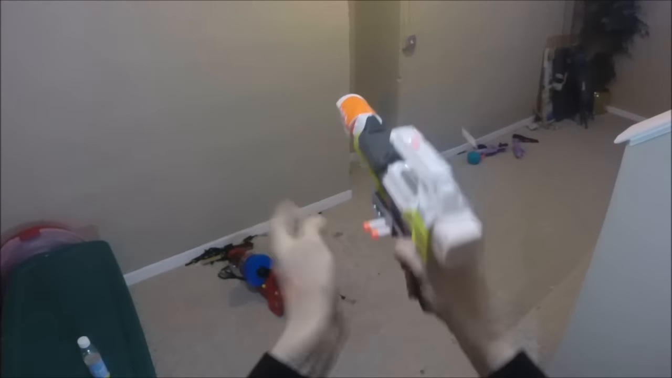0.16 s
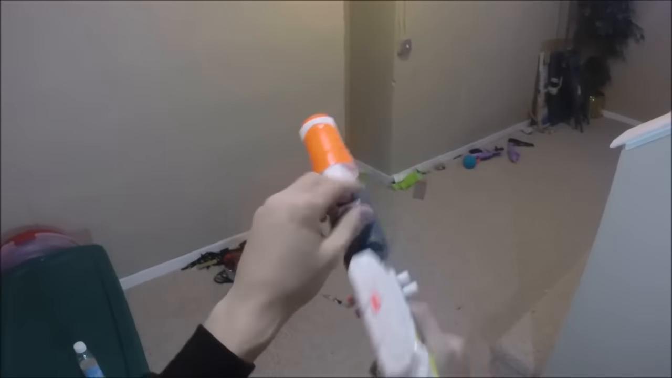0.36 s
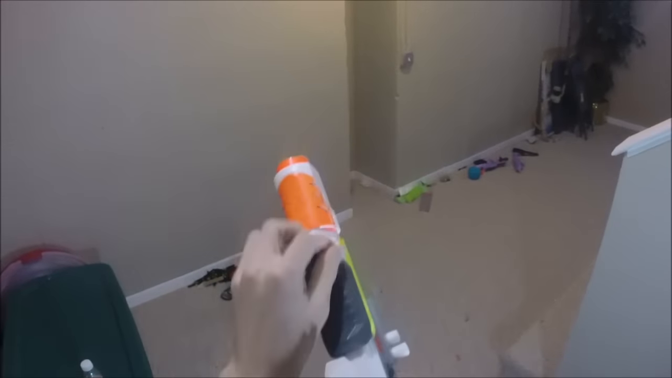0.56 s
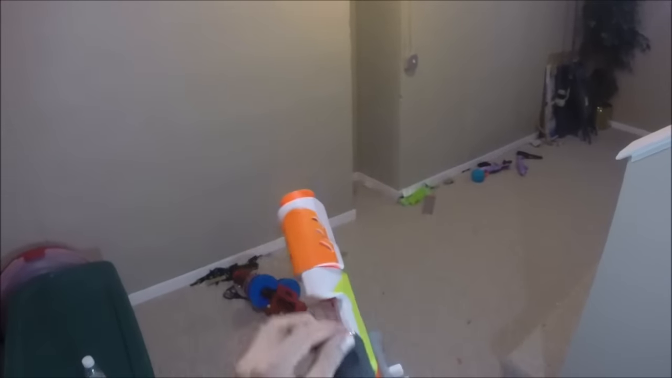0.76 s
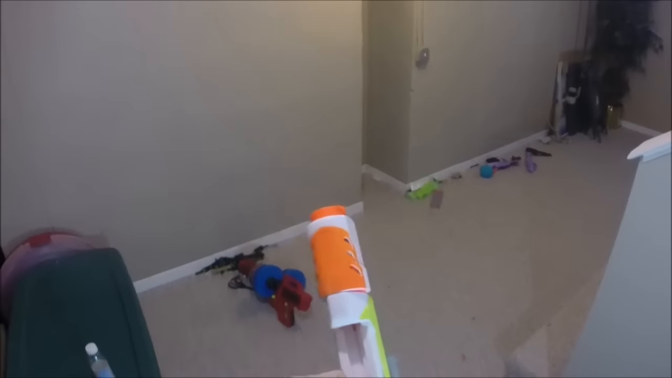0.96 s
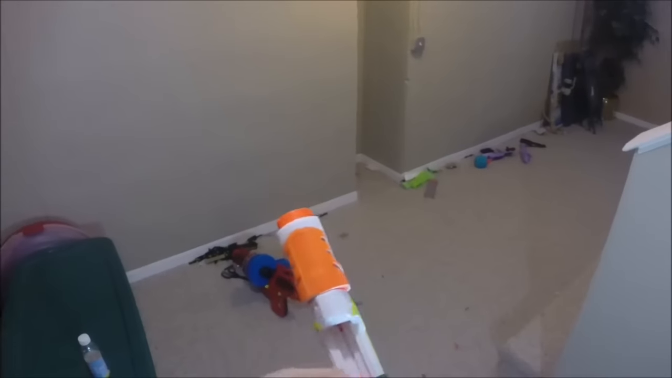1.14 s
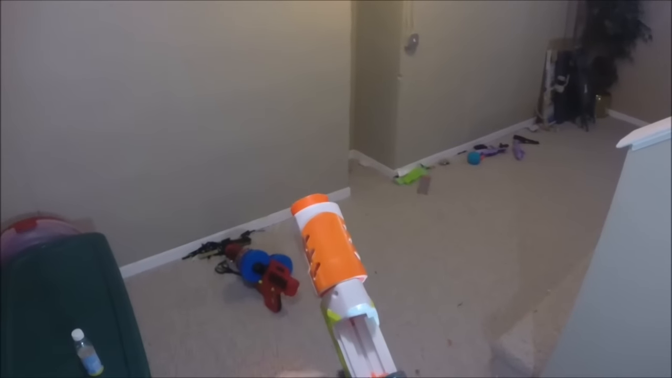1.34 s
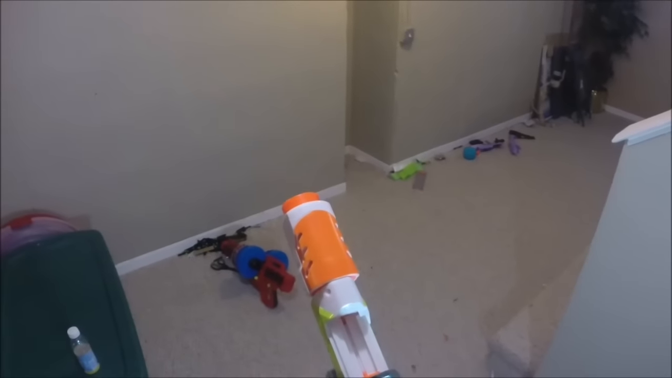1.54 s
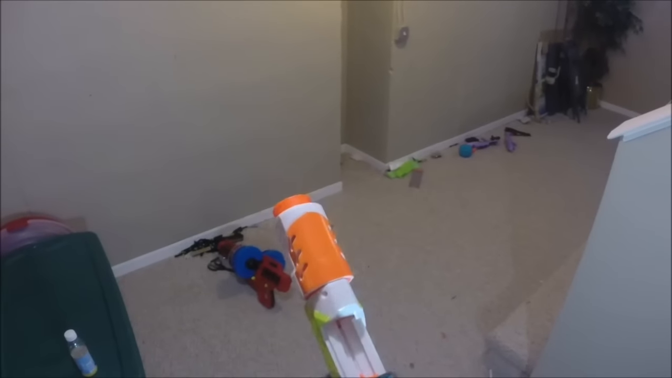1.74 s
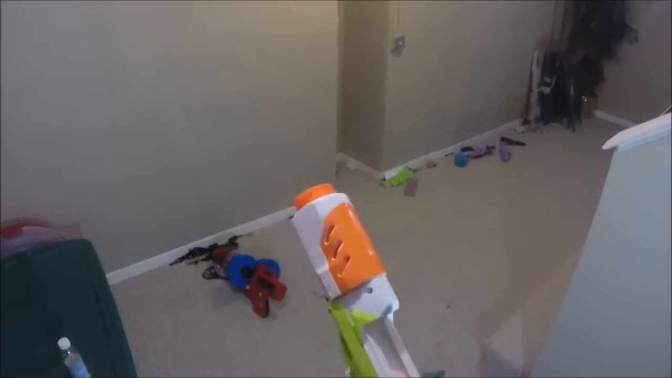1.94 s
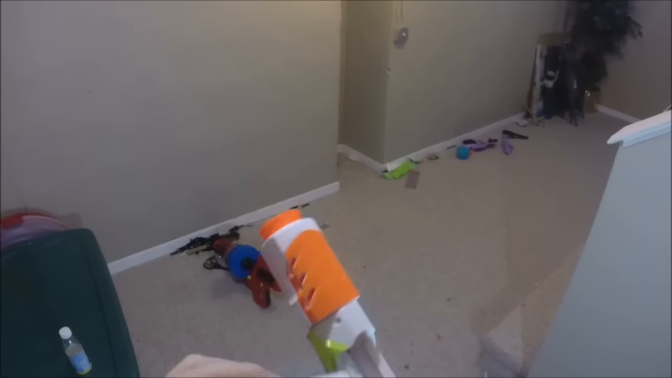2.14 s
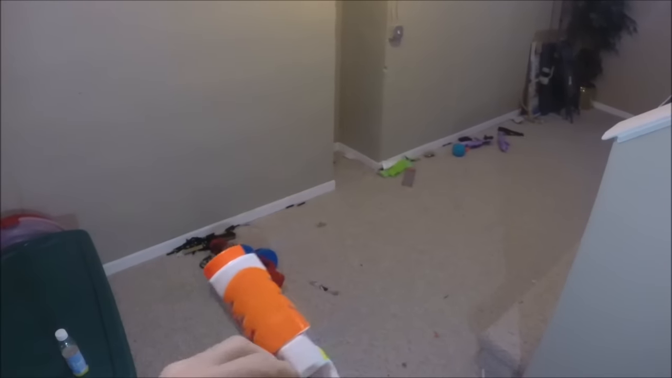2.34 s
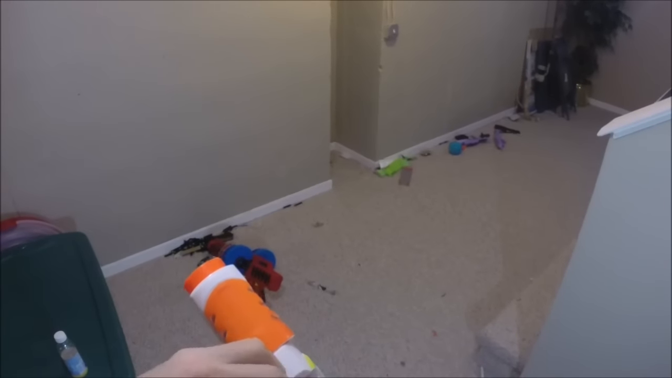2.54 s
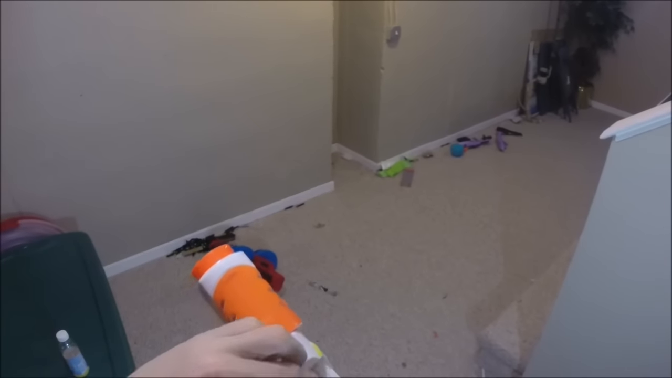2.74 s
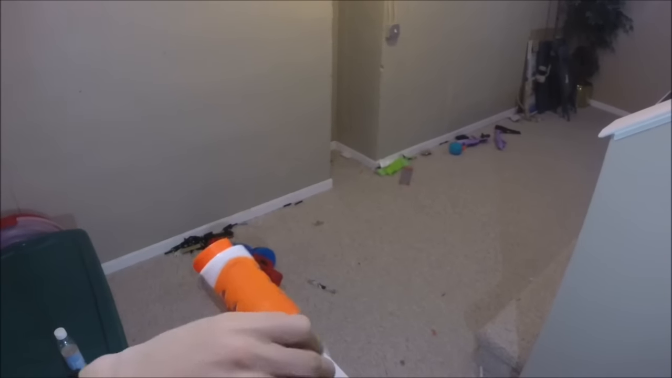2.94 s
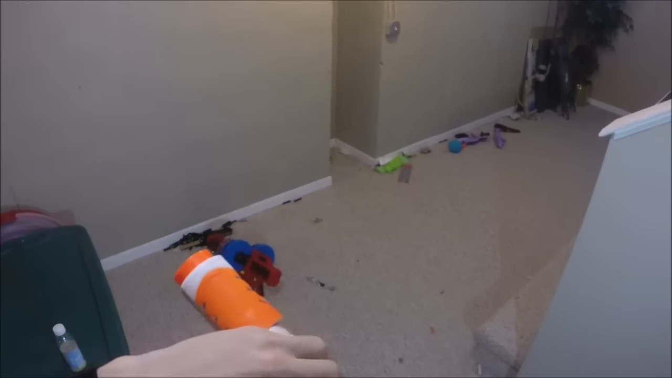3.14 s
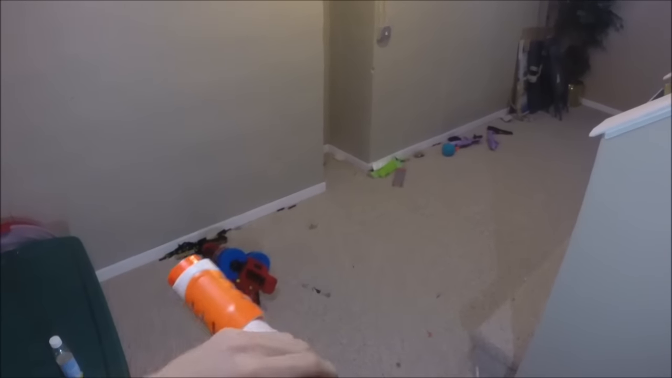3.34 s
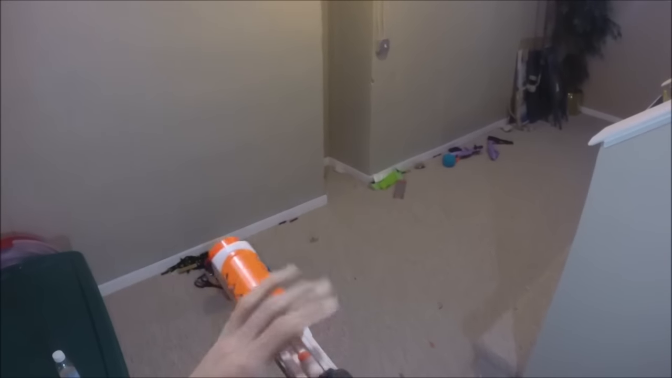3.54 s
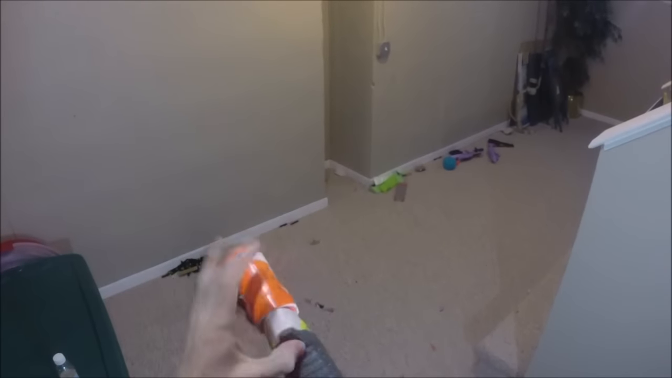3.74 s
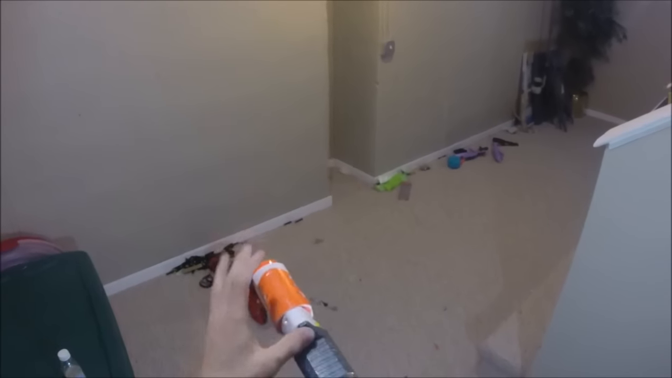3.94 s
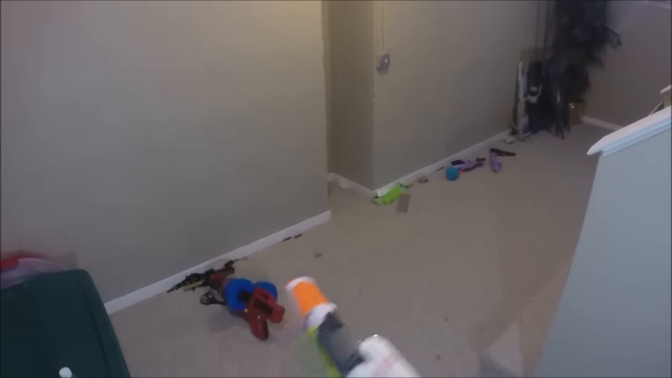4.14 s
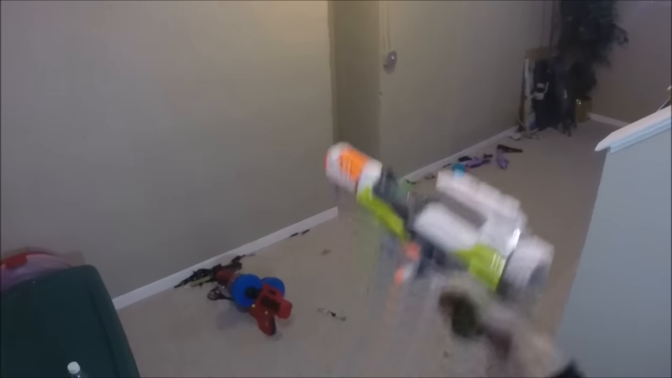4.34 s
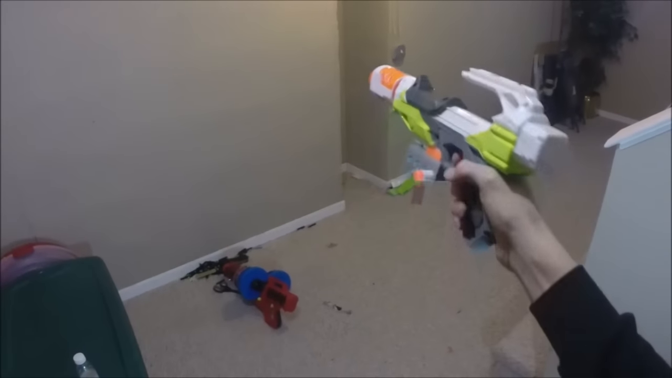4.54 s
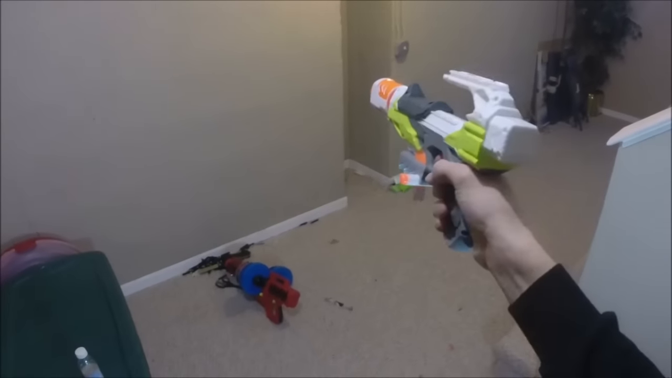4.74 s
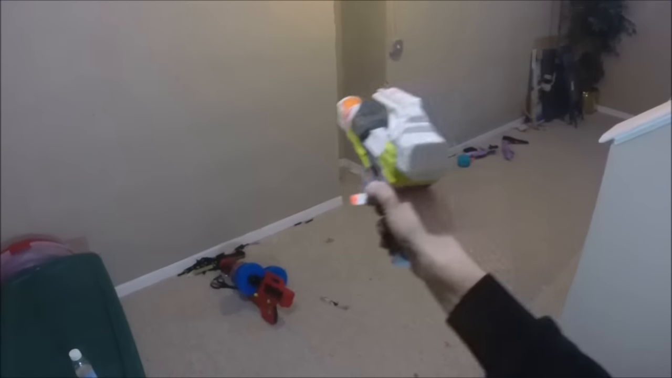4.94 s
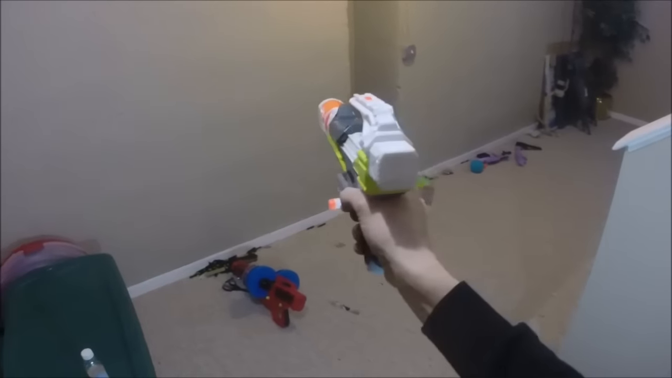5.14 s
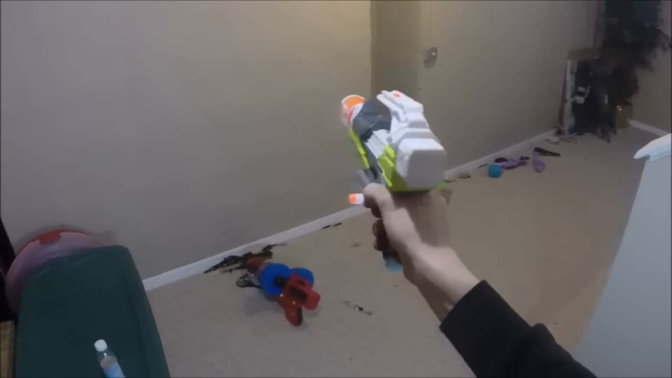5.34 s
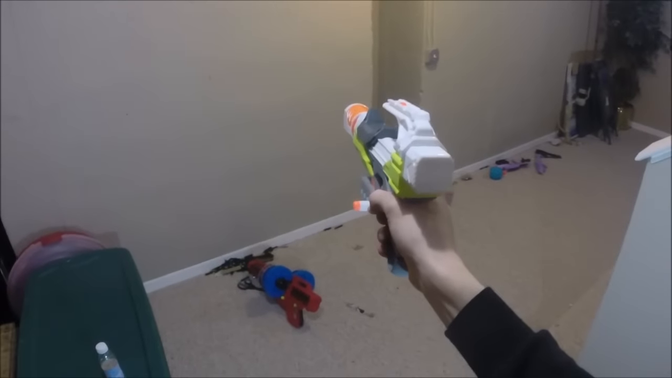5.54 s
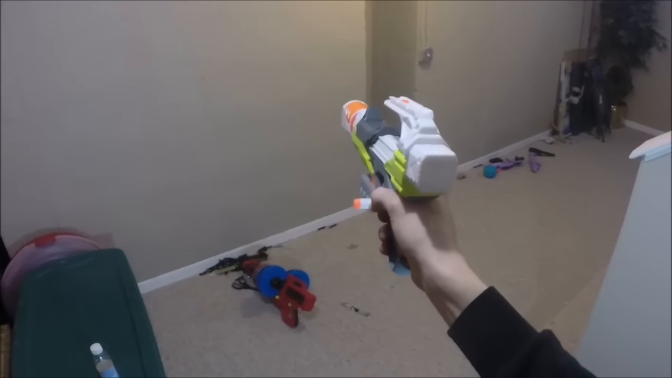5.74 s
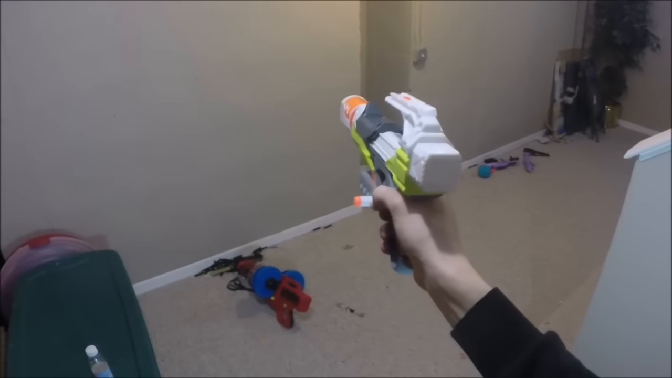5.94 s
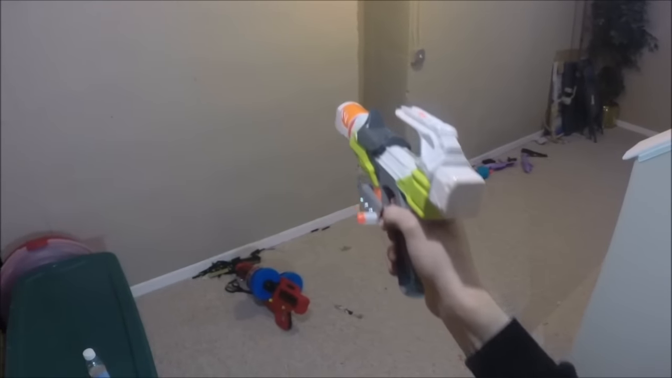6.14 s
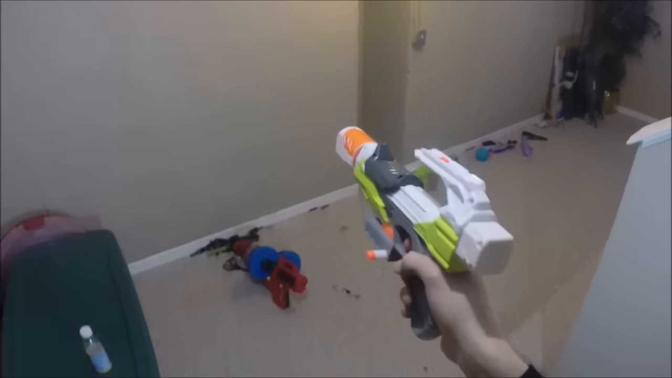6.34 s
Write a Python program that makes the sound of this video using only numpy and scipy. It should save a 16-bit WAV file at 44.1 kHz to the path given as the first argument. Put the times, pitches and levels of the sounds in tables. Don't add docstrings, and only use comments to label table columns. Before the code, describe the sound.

In a quiet room, a hollow plastic dart blaster clatters, is loaded by hand, snaps shut, fires with a twang, and its dart drops on carpet.

```python
import sys
import numpy as np
from scipy import signal
from scipy.fft import rfft, irfft, next_fast_len
from scipy.io import wavfile

SR = 44100
rng = np.random.default_rng(int(sys.argv[2]) if len(sys.argv) > 2 else 0)


def invert_db(x):
    u = np.asarray(x, float) / 20
    return 10 ** u


def master(y):
    cut = np.clip(np.atleast_2d(y).T, -1, 1)
    pcm = np.round(cut * 32767)
    wavfile.write(sys.argv[1], SR, pcm.astype(np.int16))


N = 281790

# (pitch_hz, width_hz, level_db)
SHELL_RINGS = [(736, 79, 5), (978, 68, 7), (1137, 73, 7.5), (1237, 190, 2), (1540, 130, -0.5),
               (1920, 420, -10)]
# (pitch_hz, width_hz, level_db)
TUBE_RINGS = [(665, 110, -4.5), (946, 150, 5), (1050, 110, 6.5), (1268, 37, 7.5), (1337, 120, -2),
              (1634, 120, -8.5)]


def unit(x):
    return x / np.sqrt(np.mean(x ** 2) + 1e-20)


def along(points, hz):
    f, v = np.transpose(points)
    return np.interp(np.log(hz + 1), np.log(f + 1), v)


def resonate(x, modes, scatter_db=0, widen=1):
    size = next_fast_len(len(x) + 4096)
    f = np.fft.rfftfreq(size, 1 / SR)
    luck = rng.standard_normal((len(modes), 2)) * scatter_db
    gain = 0
    for k, ((hz, width, db), (more_db, detune_percent)) in enumerate(zip(modes, luck)):
        pitch = hz * (1 + detune_percent / 100)
        damping = 1j * f * width * widen
        gain = gain + (-1) ** k * invert_db(db + more_db) * damping / (pitch ** 2 - f * f + damping)
    return irfft(rfft(x, size) * gain, size)[:len(x)]


def coloured(spectrum, size):
    m = next_fast_len(size + 8192)
    colour = invert_db(along(spectrum, np.fft.rfftfreq(m, 1 / SR)))
    return unit(irfft(rfft(rng.standard_normal(m)) * colour, m)[:size])


def echo(x):
    # (pitch_hz, t60_s)
    room_t60 = [(100, .25), (300, 0.3), (1000, 0.41), (3000, 0.47), (8000, 0.44), (14000, 0.23)]
    hz, t, z = signal.stft(rng.standard_normal(SR // 2), SR, nperseg=256)
    fade = invert_db(-60 * t / along(room_t60, hz)[:, None])
    tail = signal.istft(z * fade, SR, nperseg=256)[1]
    return signal.fftconvolve(np.pad(x, (200, 0)), tail / np.linalg.norm(tail))


def contacts(rows, rings_hit, hollow_db, crack_db, wet_db, blow, kick_db=-6):
    # (pitch_hz, width_hz, level_db)
    hollow = [(125, 72, -13.5), (205, 110, -5.5), (300, 120, -2.5), (424, 110, 1)]
    # (pitch_hz, width_hz, level_db)
    panel = [(2124, 170, 0.5), (2700, 180, -1.5), (3260, 160, -0.5), (3930, 210, -4), (4550, 410, -1),
             (4810, 520, -6)]
    # (pitch_hz, width_hz, level_db)
    crack = [(5680, 460, 1), (6670, 490, 6.5), (6850, 1500, -1.5), (9650, 1800, -21), (12000, 7500, -13.5)]
    # (pitch_hz, width_hz)
    spans = [(280, 1200), (1100, 2600), (3300, 8200), (6200, 7200)]
    lead = 4410
    out = np.zeros(lead + N + SR)
    t = np.arange(SR // 8) / SR
    push = np.exp(-.5 * ((t - .0002) / .00004) ** 2)
    soft = signal.butter(2, 9200, fs=SR, output="sos")
    parts = list(zip((hollow, rings_hit, panel, crack), [[(hz, width, 0)] for hz, width in spans]))

    def radiate(x, span):
        return resonate(resonate(x, span), span)

    click = 1. * (t == 0)
    blurred = np.array([np.abs(rfft(unit(resonate(radiate(click, span), modes, widen=2.3))))
                        for modes, span in parts])
    for start_s, level_db, hard_db, t60 in rows:
        unevenness = invert_db(5 * rng.standard_normal(len(t) // 40 + 1)).repeat(40)[:len(t)]
        rattle = rng.standard_normal(len(t)) * unevenness
        force = rattle * invert_db(-60 * t / np.clip(t60, .003, .2)) + blow * push / push.sum()
        force = signal.sosfilt(soft, force)
        kicks = [radiate(force, span) for _, span in parts]
        rings = np.array([resonate(kick, modes, scatter_db=3.0) + invert_db(kick_db) * kick
                          for kick, (modes, _) in zip(kicks, parts)])
        part_db = np.array([hollow_db, 0, hard_db, hard_db + crack_db])
        gains = invert_db(level_db + part_db) * [1, 1, -1, -1]
        rings *= (gains / np.abs(rings).max(axis=1))[:, None]
        diffuse = irfft(np.sqrt(np.var(rings, axis=1) @ blurred ** 2), len(t))
        tail = invert_db(wet_db) * echo(np.roll(diffuse, 400))
        start = lead + round(start_s * SR)
        out[start:][:len(t)] += rings.sum(axis=0)
        out[start - 300:][:len(tail)] += tail
    return out[lead:lead + N]


def room_hush():
    # (pitch_hz, level_db per Hz)
    hush = [(12, -37.5), (20, -1), (204, -5.5), (388, -10), (1060, -14.5), (3440, -23), (13200, -36.5),
            (16000, -54)]
    return invert_db(-58.5) * coloured(hush, N)


def plunger_shots():
    # (start_s, level_db, hardness_db, rattle_t60_s)
    earlier = [
        (-.03, -9.5, -2.5, 0.1),
        (.004, -25, -8, 0.023),
        (.034, -32.5, -3, 0.011),
    ]
    # (start_s, level_db, hardness_db, rattle_t60_s)
    new_shot = [
        (5.293, -31.5, -4.5, 0.023),
        (5.295, -14.5, 0, .032),
        (5.3, -7.5, -6, 0.024),
        (5.3042, -3.5, -18, .04),
        (5.320, -4, -10.5, 0.035),
        (5.327, -14.5, -4.5, .09),
    ]
    return contacts([*earlier, *new_shot], TUBE_RINGS, hollow_db=-7.5, crack_db=-8.5,
                    wet_db=-8.0, blow=16.6, kick_db=-13.5)


def spring():
    # (struck_s, damped_by_hand_s)
    times = [
        (-.02, .21),
        (-.02, .675),
        (5.302, 6.1),
        (1.101, 1.34),
    ]
    # (pitch_hz, level_db, t60_s,
    # swell_s)
    low_coil = [(165, -43.5, 0.74, .03), (301, -37, 1, 0.14)]
    high_coil = [(1012, -48, 2, 0.13), (1300, -39.5, 0.79, 0.013), (1395, -40, 4, 0.84)]
    coil_and_thump = [(138, -25, 0.18, .003), (206, -20.5, 0.32, 0.0045), (250, -24.5, 0.14, .003),
                      (286, -29, 0.26, 0.0038), (1080, -33, 0.56, 0.0093), (1240, -44.5, 0.6, .01),
                      (1330, -55.5, 2, .05)]
    return_coil = [(900, -33.5, 0.42, .004), (954, -42.5, 0.57, 0.0039), (3620, -61, 0.37, .02)]
    out = np.zeros(N)
    for (struck, damped), tones in zip(times, (low_coil, high_coil, coil_and_thump, return_coil)):
        t = np.clip(np.arange(N) / SR - struck, 0, None)
        damping_db = -60 * np.clip(t + struck - damped, 0, None) / .15
        for hz, db, t60, swell in tones:
            loudness = invert_db(db - 60 * t / t60 + damping_db) * (1 - np.exp(-t / swell))
            out += loudness * np.sin(2 * np.pi * hz * t)
    return out


def dart_hits():
    # (start_s, level_db, hardness_db, rattle_t60_s)
    hits = [
        (.119, -32.5, -8, 0.084),
        (5.436, -18, -11, 0.1),
    ]
    return contacts(hits, TUBE_RINGS, hollow_db=-11.5, crack_db=-13.5, wet_db=-0.5, blow=28)


def taps(rows, hollow_db):
    out = np.zeros(N)
    for *row, hz in rows:
        rings = [(hz, hz / 16, 0)] + [(pitch, width, db - 12.5) for pitch, width, db in SHELL_RINGS]
        out += contacts([(*row, .04)], rings, hollow_db, crack_db=-6.5, wet_db=-5.0, blow=25, kick_db=-16.5)
    return out


def palm_pats():
    # (start_s, level_db, hardness_db, pitch_hz)
    pats = [
        (.447, -28.5, -13.5, 652),
        (.637, -42, -9, 1400),
        (1.864, -45, -3, 730),
        (2.175, -44, -33.5, 420),
        (3.063, -48, 3, 907),
        (5.211, -32.5, -11, 810),
        (5.243, -37.5, -25, 859),
    ]
    return taps(pats, hollow_db=-3.5)


def finger_ticks():
    # (start_s, level_db, hardness_db, pitch_hz)
    ticks = [(.529, -41.5, -10.5, 1490), (.686, -22.5, -14, 730), (.711, -29, -4, 700),
             (1.454, -39.5, -14, 1010), (1.653, -50.5, 1, 713), (2.377, -40, -9, 1050),
             (2.443, -47.5, 0, 953), (2.48, -48, -20, 762), (2.551, -50.5, -1, 1030),
             (3.041, -37.5, -9.5, 974), (3.187, -39, -21, 751), (3.196, -43, -6, 1050),
             (3.335, -35.5, -11.5, 875), (3.394, -39.5, -11, 890), (3.433, -39, -6.5, 2030),
             (3.492, -45, -14, 982), (3.567, -34, -7, 1010), (4.261, -48.5, -1.5, 1240)]
    return taps(ticks, hollow_db=-14.5)


def rubbing():
    # (peak_s, build_up_s, letting_go_s, shell_db, hiss_db)
    strokes = [(0.67, 0.11, 0.084, -45.5, -55.5), (0.719, 0.0045, 0.027, -32, -48.5),
               (.758, 0.043, 0.011, -62, -58), (1.04, .01, .1, -44, -82), (1.08, 0.035, 0.0085, -51, -46),
               (1.219, .004, 0.022, -39, -83), (1.83, 0.035, 0.057, -46, -42.5),
               (2.174, .05, 0.23, -52, -79), (2.386, .12, 0.045, -64, -63), (2.445, 0.035, 0.027, -52, -56),
               (3.04, 0.048, 0.11, -46.5, -59), (3.1, 0.15, 0.034, -54, -61.5),
               (3.189, .04, 0.098, -48, -61), (3.708, .004, 0.019, -38, -55),
               (3.754, .003, 0.15, -30.5, -49.5), (3.786, .1, 0.0092, -41, -47),
               (5.22, 0.0057, .05, -47, -61.5), (5.245, .01, .2, -74, -74.5)]
    # (pitch_hz, level_db per Hz)
    skin = [(1500, -27), (3000, 1.5), (5000, 2), (7000, -4), (10000, -21.5), (15000, -45.5)]
    span_db = 30
    t = np.arange(N) / SR
    grains = rng.standard_normal(N) * invert_db(2 * rng.standard_normal(N // 60 + 1)).repeat(60)[:N]
    body = unit(resonate(grains, SHELL_RINGS))
    hiss = coloured(skin, N)
    press, slip = np.zeros((2, N))
    for peak, rise, fall, shell_db, hiss_db in strokes:
        near = slice(round((peak - 2 * rise) * SR), round((peak + 2 * fall) * SR))
        stroke = invert_db(-span_db * np.maximum((peak - t[near]) / rise, (t[near] - peak) / fall))
        press[near] += invert_db(shell_db - 3) * stroke
        slip[near] += invert_db(hiss_db - 1.5) * stroke
    out = press * body + slip * hiss
    return out + invert_db(-16) * echo(out)[:N]


def slide_rack():
    # (start_s, level_db, hardness_db, rattle_t60_s)
    rack = [(0.764, -35, -10.5, .01), (0.7714, -15.5, -12, 0.013), (.773, -7.5, 0.5, 0.027),
            (0.779, -10.5, 3.5, 0.054), (.82, -7, 2, 0.072), (.825, -13, -9, 0.11), (.842, -5.5, -3, 0.053),
            (.88, -5.5, -2, 0.035), (.886, -12, 0.5, 0.064), (.905, -7, -4, 0.041), (1.084, -29, -5, 0.26),
            (1.101, -12.5, -3, 0.044), (1.193, -44, -24, .035)]
    # (start_s, level_db, hardness_db, rattle_t60_s)
    stops = [
        (.919, -16.5, 7.5, 0.053),
        (.93, -15, -5.5, 0.079),
        (1.21, -26, -23, 0.074),
    ]
    blow = 32
    moving = contacts(rack, SHELL_RINGS, hollow_db=-39.5, crack_db=-6, wet_db=-10.5, blow=blow, kick_db=-13.5)
    ending = contacts(stops, SHELL_RINGS, hollow_db=-20, crack_db=-3.5, wet_db=-18.5, blow=blow, kick_db=-14.5)
    return moving + ending


def squeak():
    # (start_s, end_s, level_db of each harmonic)
    foam_squeak = (2.44, 2.53, [-83, -74, -75, -74])
    start, end, levels = foam_squeak
    pitch_hz = 3320
    t = np.arange(N) / SR
    edge = np.clip(np.minimum(t - start, end - t) / 0.012, 0, 1)
    return edge * sum(invert_db(db) * np.sin(2 * np.pi * pitch_hz * (k + 1) * t) for k, db in enumerate(levels))


def breech_snap():
    # (start_s, level_db, hardness_db, rattle_t60_s)
    breech = [(3.701, -26.5, -10.5, 0.037), (3.752, -29, -9.5, .033), (3.768, -32.5, -3, 0.015),
              (3.787, -29, 1, 0.037), (3.79, -14, -3, 0.041), (3.7941, -4, -5, 0.028),
              (3.797, -0.5, -7.5, 0.032), (3.800, -8.5, -2, 0.026), (3.805, -12, -8, 0.073),
              (3.811, -15, -11, 0.095), (3.836, -21.5, -6, 0.061)]
    return contacts(breech, SHELL_RINGS, hollow_db=-23, crack_db=-6, wet_db=-11, blow=20, kick_db=-3.5)


def dart_on_carpet():
    # (pitch_hz, width_hz, level_db)
    carpet = [(348.4, 127, -3.5), (484, 80, 1.5), (751, 150, -6.5), (910, 164, -4.5)]
    # (start_s, level_db, hardness_db, rattle_t60_s)
    drops = [
        (5.865, -29, -42, 0.26),
    ]
    # (start_s, level_db, hardness_db, rattle_t60_s)
    rolls = [
        (5.93, -55.5, -30, 0.061),
        (6.31, -50.5, -33.5, 0.12),
    ]
    landing = contacts(drops, carpet, hollow_db=2.5, crack_db=-7, wet_db=-13.0, blow=22.0, kick_db=-26)
    rolling = contacts(rolls, carpet, hollow_db=13.5, crack_db=-9, wet_db=-12.0, blow=18.5, kick_db=-39)
    return landing + rolling


def scene():
    shots = plunger_shots() + spring()
    hands = palm_pats() + finger_ticks() + rubbing() + squeak()
    mechanism = slide_rack() + breech_snap()
    darts = dart_hits() + dart_on_carpet()
    return (room_hush() + shots + hands + mechanism + darts)[None]


def thin_treble(x):
    # (middle_s, lost_above_hz)
    dull_moments = [(.373, 3000), (.839, 6500), (1.525, 2000), (1.781, 3500), (2.1, 3000), (2.251, 3000),
                    (2.313, 3500), (3.126, 4000), (4.191, 2800), (4.512, 4500), (4.769, 5500),
                    (5.024, 3500), (5.621, 3500), (5.728, 4000), (5.875, 1400), (4.897, 3000),
                    (6.153, 4800), (6.166, 4800), (6.179, 4800)]
    hz, t, z = signal.stft(x, SR, nperseg=256, noverlap=192)
    loss = 0
    for middle, edge_hz in dull_moments:
        dip = np.cos(np.pi / 2 * np.clip((t - middle) * SR / 1024, -1, 1)) ** 4
        loss = loss + (hz[:, None] > edge_hz) * dip
    kept = 1 - .9 * np.clip(loss, 0, 1)
    return signal.istft(z * kept, SR, nperseg=256, noverlap=192)[1][..., :N]


def band_limit(x):
    return signal.sosfilt(signal.butter(12, 16480, fs=SR, output="sos"), x)


def record(dry):
    heard = signal.sosfilt(signal.butter(6, 14300, fs=SR, output="sos"), dry)
    rounded = heard / (1 + np.abs(heard / 1.1) ** 8) ** (1 / 8)
    return band_limit(thin_treble(rounded))


dry = scene()
out = record(dry)
master(out)
```